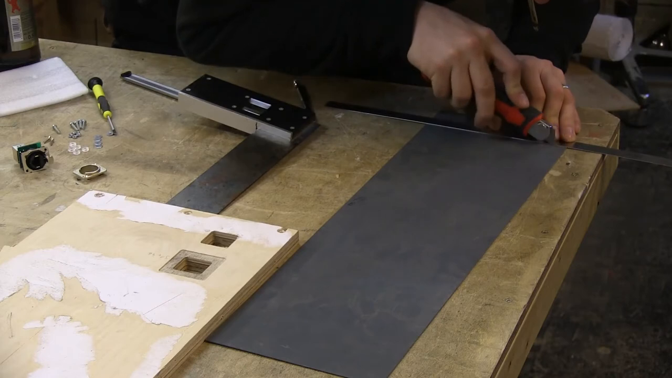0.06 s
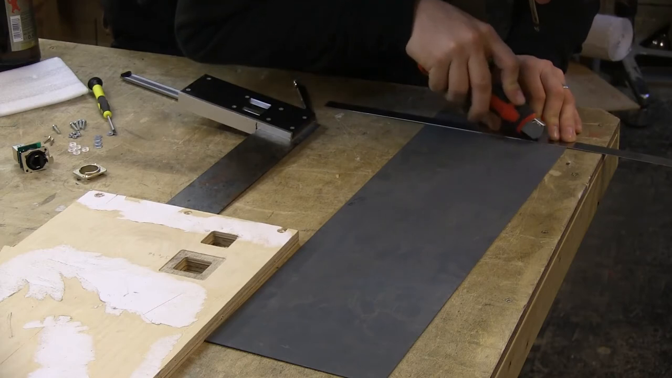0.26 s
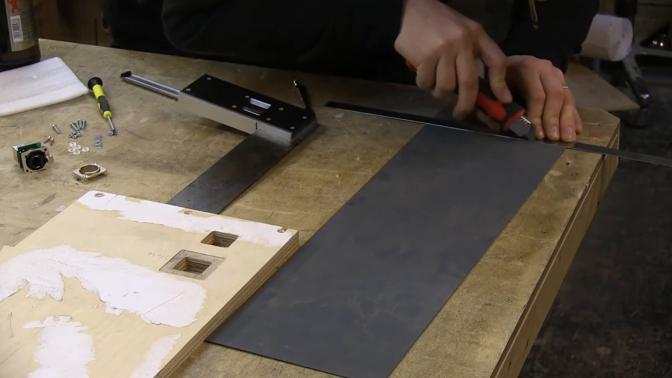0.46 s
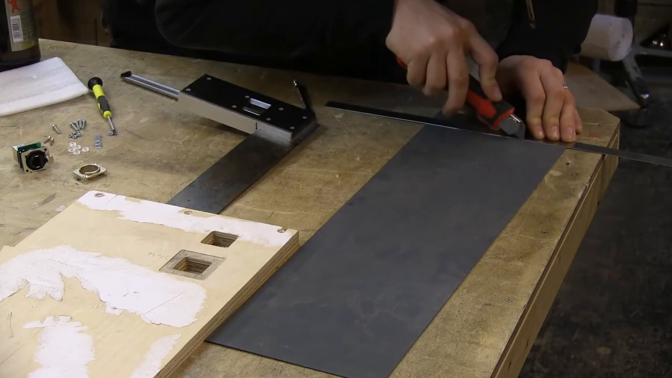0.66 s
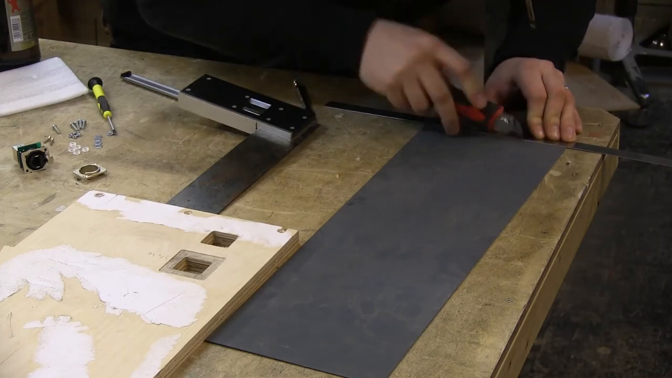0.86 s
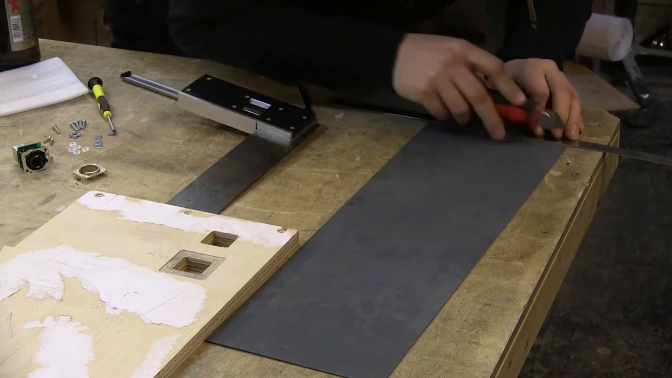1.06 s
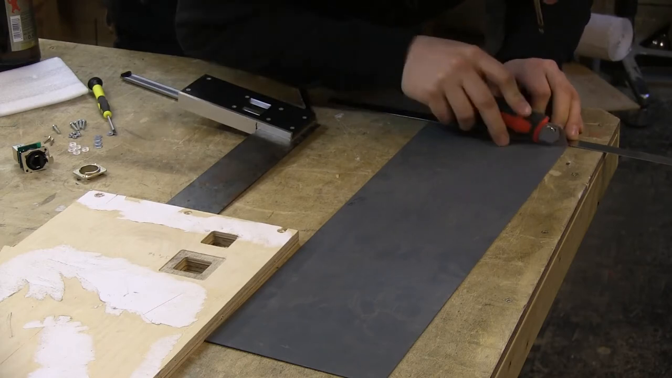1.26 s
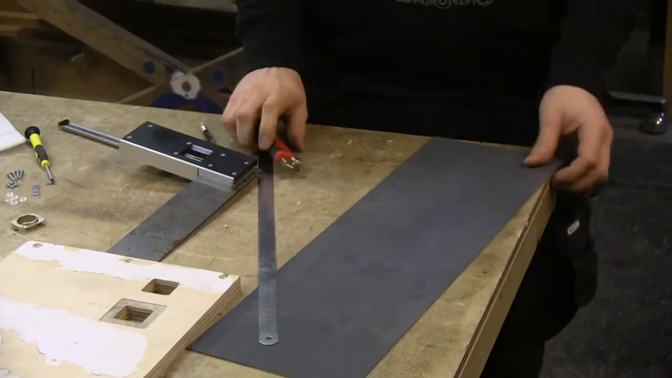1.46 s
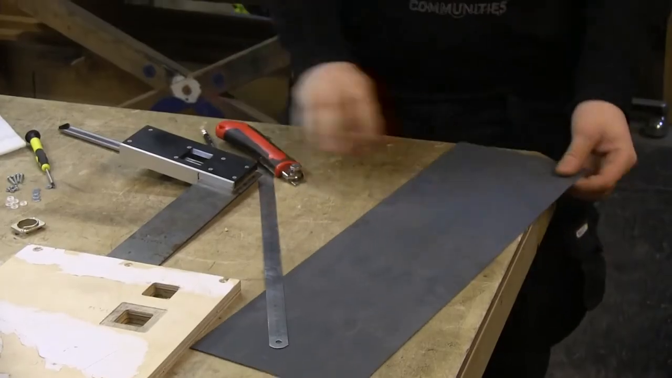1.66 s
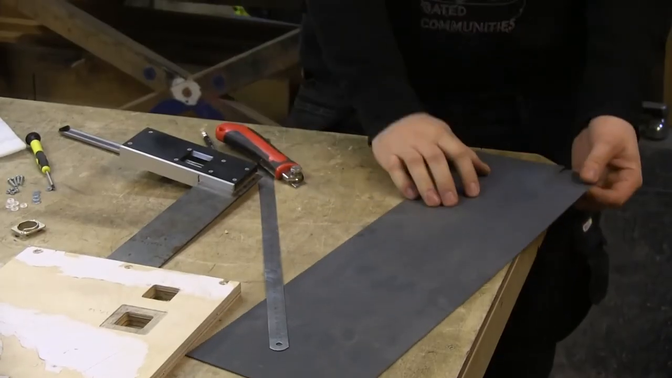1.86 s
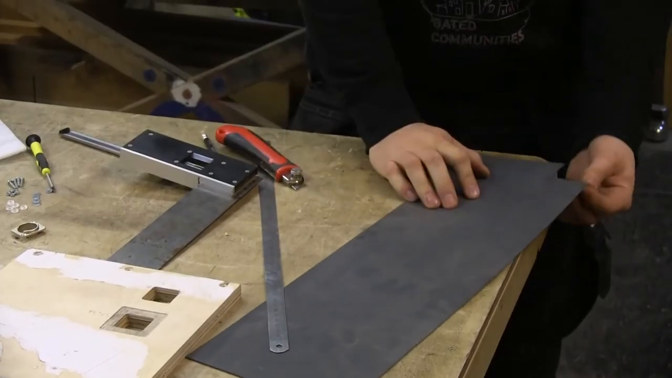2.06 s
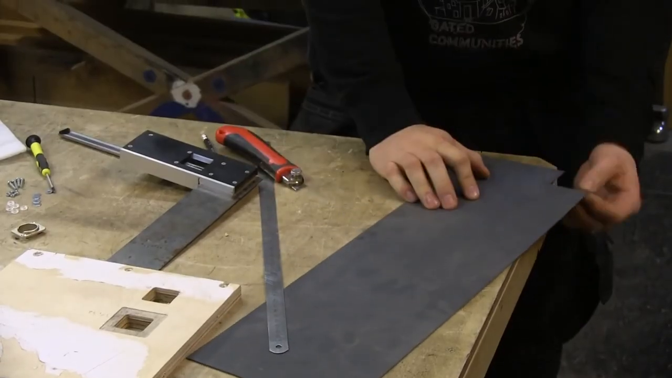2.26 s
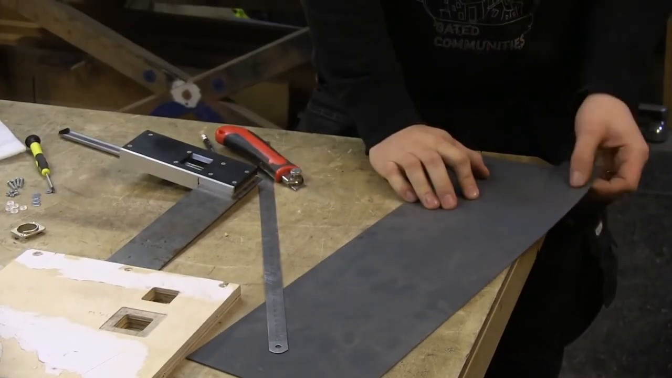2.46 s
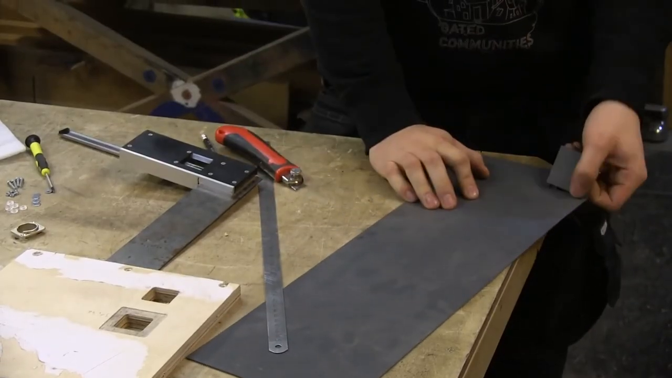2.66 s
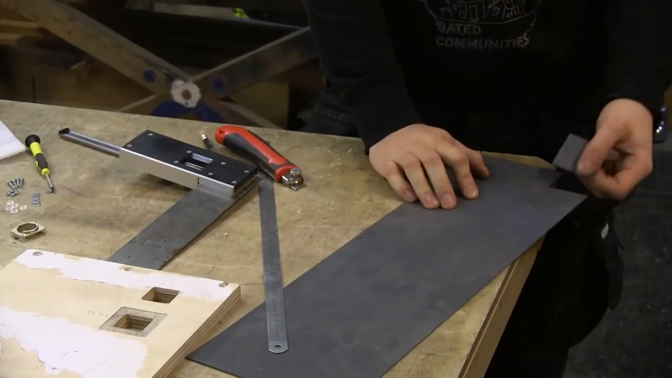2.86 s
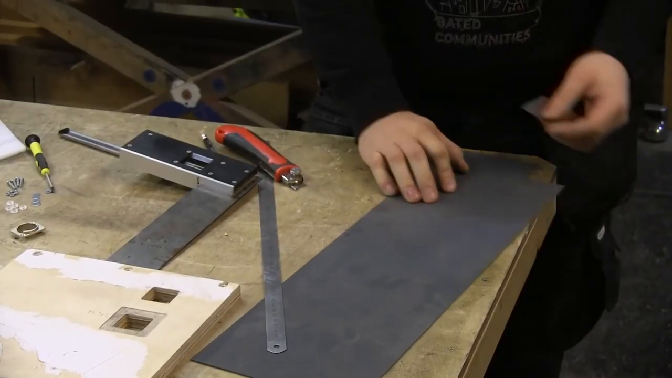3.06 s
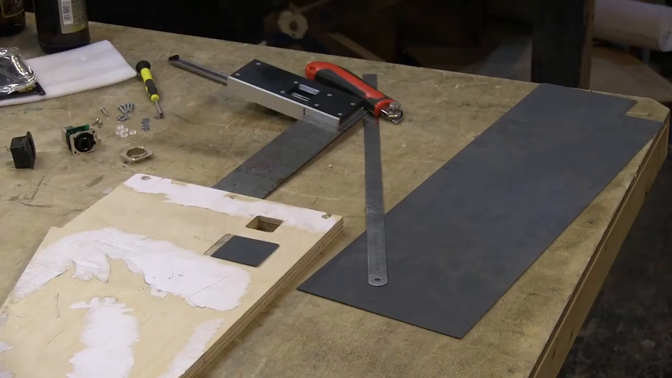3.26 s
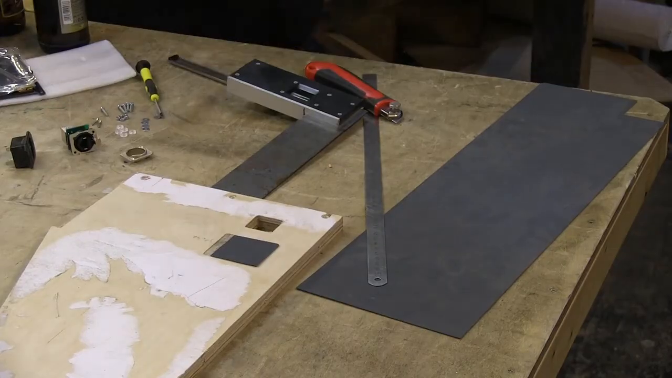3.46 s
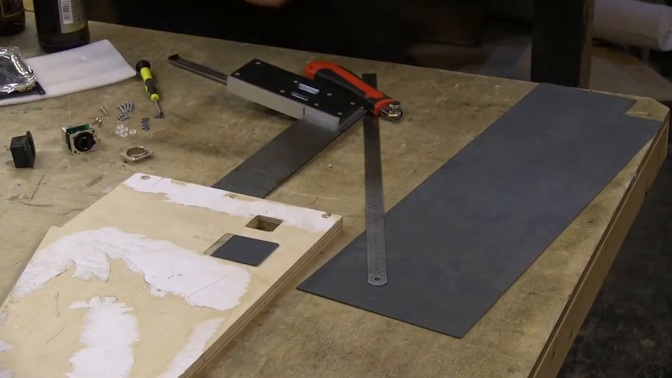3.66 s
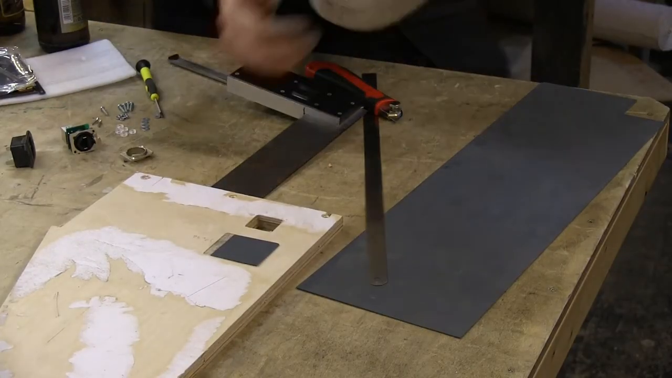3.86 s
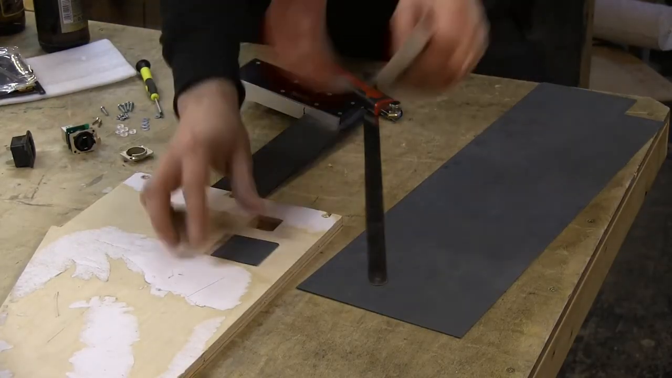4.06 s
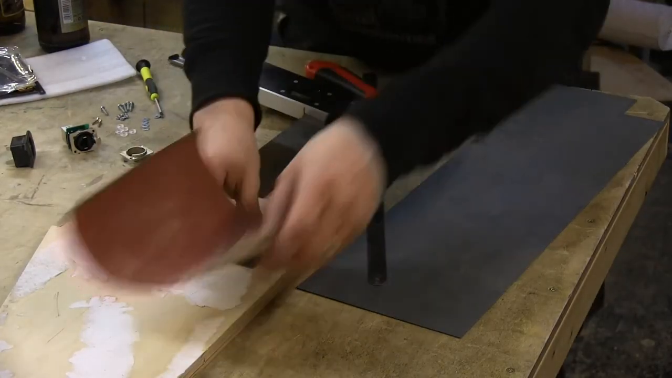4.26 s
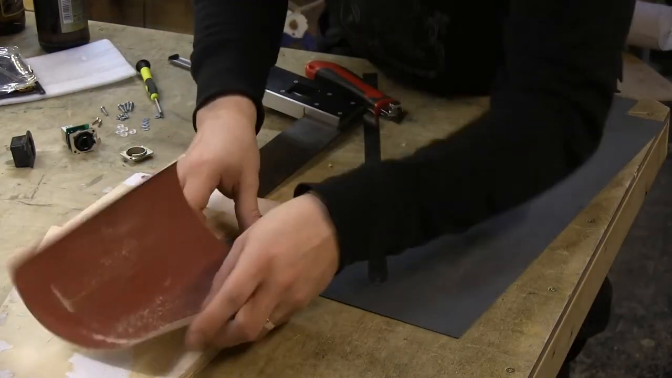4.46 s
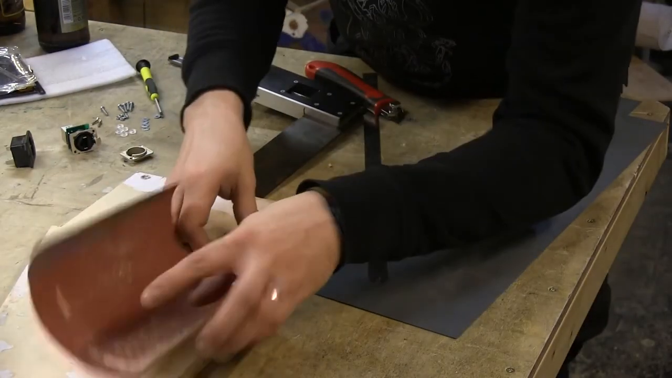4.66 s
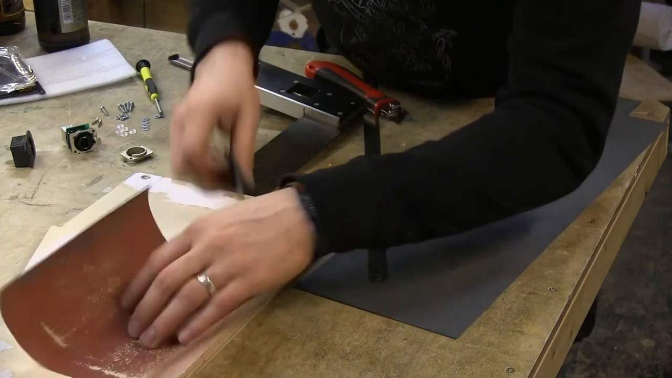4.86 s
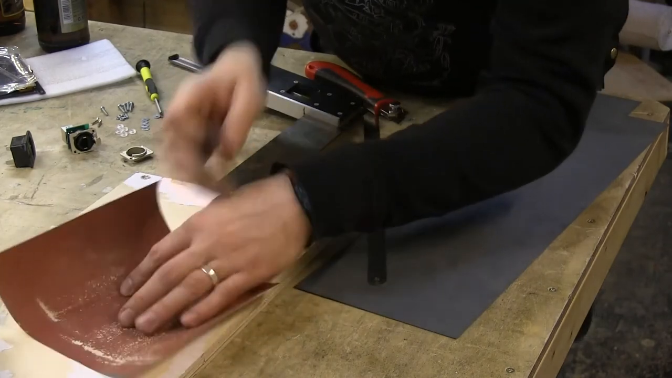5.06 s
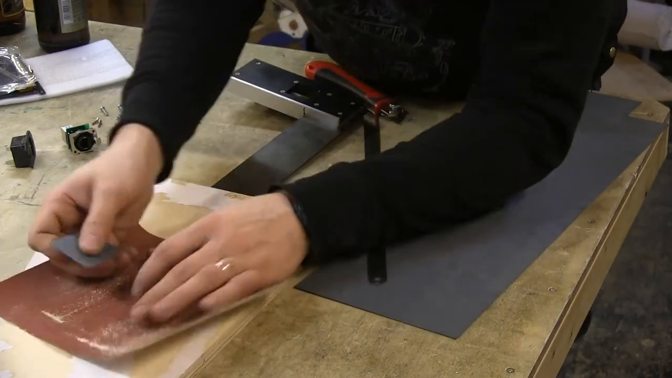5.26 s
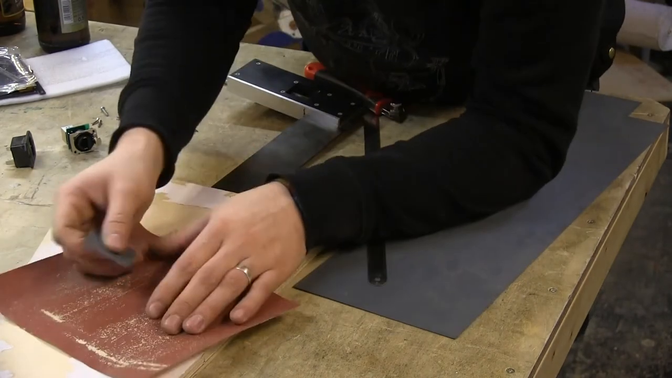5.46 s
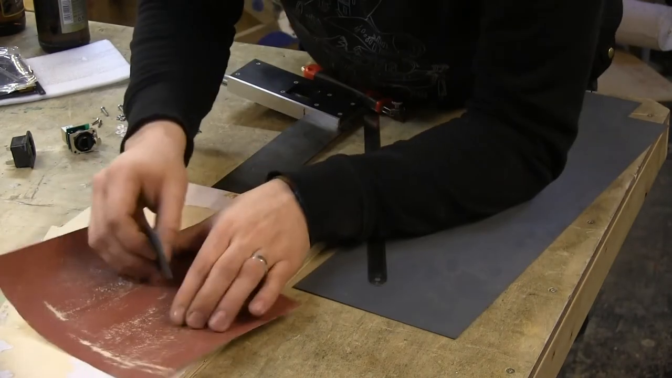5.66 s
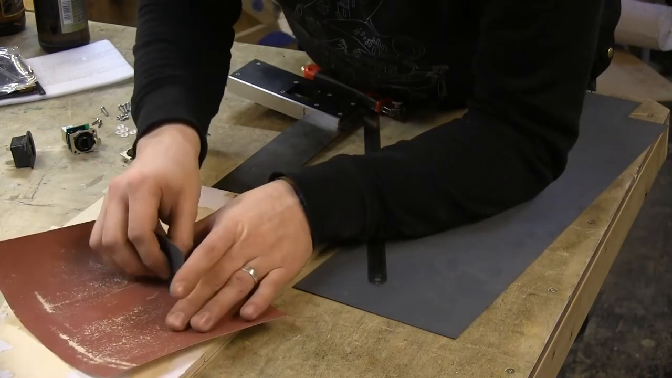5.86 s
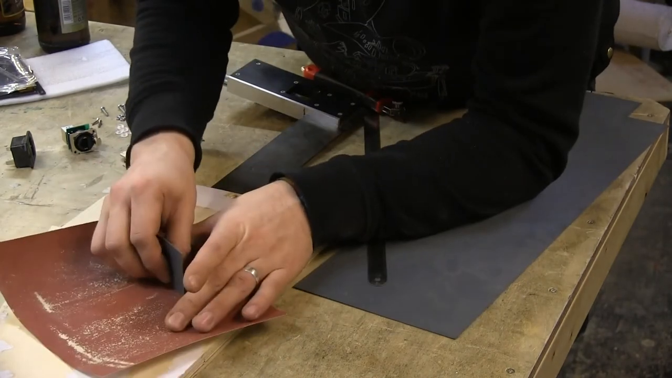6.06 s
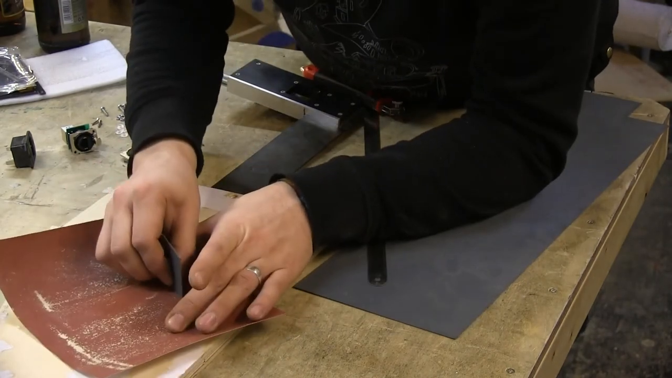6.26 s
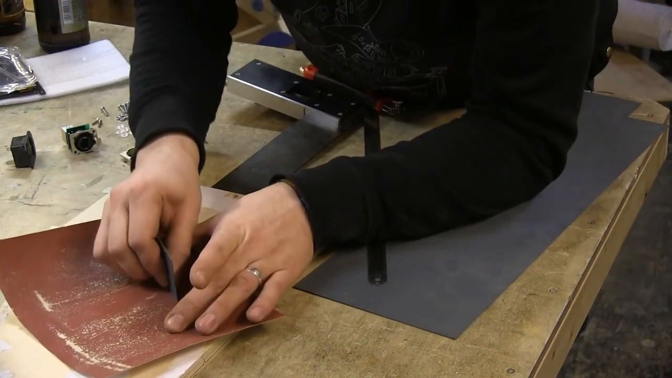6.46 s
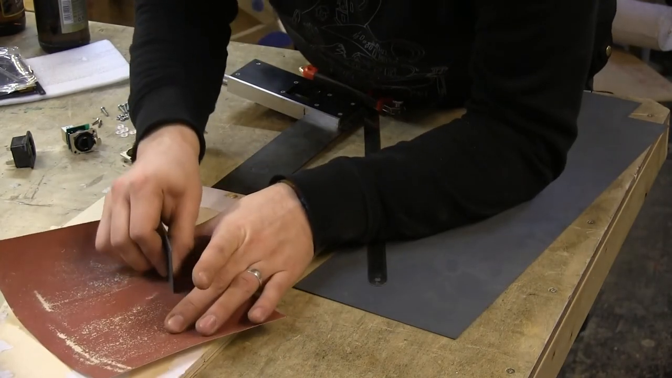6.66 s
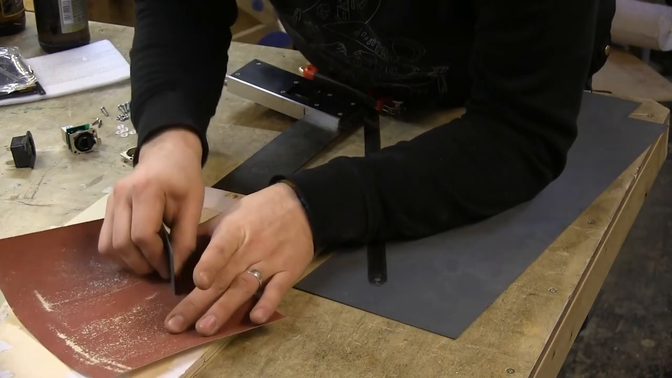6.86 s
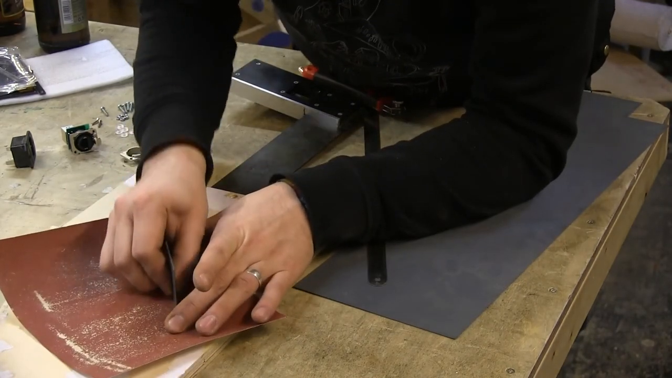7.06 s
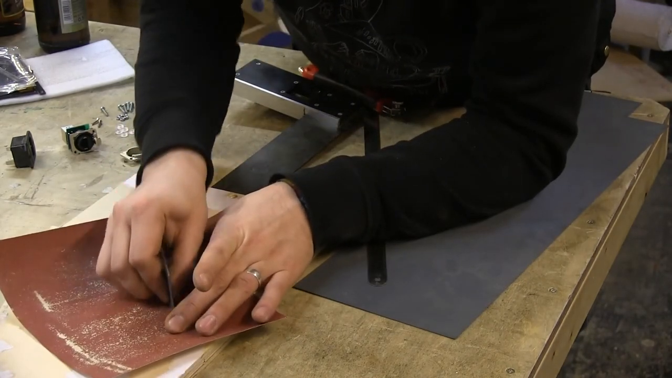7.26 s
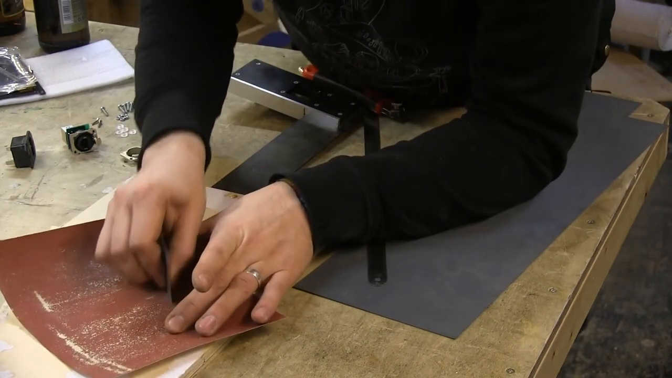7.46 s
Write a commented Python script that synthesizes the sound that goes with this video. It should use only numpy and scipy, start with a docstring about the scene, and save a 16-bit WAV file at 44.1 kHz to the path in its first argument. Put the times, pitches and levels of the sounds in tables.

```python
"""At a workbench a knife and a ruler are put down, a scored piece of plastic is flexed and snapped off,
a sheet of sandpaper is fetched and spread on a plywood board, and the piece is sanded back and forth.
Blows are noise bursts ringing bench, board or plastic; rubs and sanding are shaped, patchy noise.
A quiet workshop of soft noise and unsteady tones hums behind; its walls answer every knock."""
import sys
import numpy as np
from scipy import signal
from scipy.fft import rfft, irfft, next_fast_len
from scipy.io import wavfile
from scipy.ndimage import uniform_filter1d, map_coordinates

SR = 44100
rng = np.random.default_rng(int(sys.argv[2]) if len(sys.argv) > 2 else 0)


def wav_out(sig):
    """Save sig, one row per channel (or a flat mono array), as 16-bit PCM at SR to the path in sys.argv[1]."""
    wavfile.write(sys.argv[1], SR, np.round(np.clip(np.atleast_2d(sig).T, -1, 1) * 32767).astype(np.int16))


N = 331543

# the workshop's soft rush: spectrum [f/Hz, level/dB per Hz, relative]; loudness [t/s, level/dB rms]
SHOP_SPECTRUM = [(25, -49), (70, -22), (110, 2.5), (200, 0.5), (260, 4.5), (350, -2), (500, -8), (700, -9),
                 (1000, -10.5), (1600, -13.5), (2500, -17), (5000, -21), (16000, -30)]
SHOP_LEVEL = [(0, -70), (0.401, -66), (3.3, -63), (7.52, -65.5)]
# machine tones, before their wavering: [f/Hz, level/dB rms]
MACHINE_TONES = [(100, -76), (120, -72.5), (171.8, -86.5), (253, -81.5), (346.6, -72), (464.8, -84.5),
                 (694, -82.5)]
# hands, plastic and paper sliding; around 1.4-1.8 s, the rattle after the tools land:
# [peak t/s, swell t/s, fade t/s, surface hiss level/dB, sheet drag level/dB, wood rumble level/dB]
RUBS = [(0.4, 0.075, 0.23, -81, -72.5, -71), (0.72, 0.047, .04, -80, -71, -66.5),
        (0.976, 0.019, .03, -57, -59, -56), (1.466, 0.025, 0.037, -35.5, -35.5, -28),
        (1.56, .031, 0.039, -28.5, -27, -23.5), (1.63, 0.07, 0.21, -38.5, -44, -37.5),
        (1.72, 0.023, 0.033, -34, -41, -27), (1.939, .025, .042, -36.5, -47.5, -50),
        (2.127, 0.011, .06, -57.5, -59.5, -48), (2.645, 0.024, 0.15, -62.5, -68, -58.5),
        (3.15, 0.071, 0.081, -30, -48, -48), (3.224, 0.057, 0.035, -36.5, -49.5, -55),
        (3.38, 0.27, 0.076, -66, -68, -63), (3.542, 0.021, 0.095, -64, -66.5, -64),
        (3.668, .022, 0.067, -52, -52, -47.5), (3.769, .07, .082, -49.5, -51, -49.5),
        (3.928, 0.036, 0.041, -54.5, -48.5, -54.5), (4.01, 0.038, 0.096, -67, -60.5, -57.5),
        (4.106, 0.0077, .047, -33, -35.5, -43), (4.14, 0.043, .084, -31, -34.5, -33.5),
        (4.34, 0.13, 0.14, -42.5, -43, -42), (4.448, 0.053, 0.043, -43.5, -39, -41.5),
        (4.54, 0.058, 0.034, -53, -50, -49), (4.628, 0.067, .062, -39, -42.5, -45.5),
        (4.731, 0.074, .03, -53, -44, -54.5), (4.819, .036, 0.054, -48.5, -47, -42),
        (4.873, .013, .027, -42, -35.5, -36.5), (4.965, 0.053, 0.079, -41, -35.5, -39.5),
        (5.068, 0.03, 0.032, -32.5, -33, -41), (5.132, .06, 0.038, -26.5, -33.5, -36),
        (5.25, .045, .04, -33.5, -35.5, -33.5), (5.3, 0.016, 0.029, -36.5, -34.5, -37.5),
        (5.354, 0.025, .035, -38, -36, -37.5), (5.41, .025, 0.051, -39.5, -28, -45.5),
        (5.477, .013, 0.062, -36, -30.5, -33.5), (5.538, 0.055, 0.033, -40, -37, -26),
        (5.635, 0.033, 0.031, -37, -37.5, -36.5), (5.684, 0.022, 0.051, -38.5, -32.5, -36),
        (5.807, 0.05, 0.16, -38, -41, -45.5), (5.968, 0.039, 0.04, -49.5, -36.5, -38.5),
        (6.15, 0.07, 0.083, -68.5, -62, -75), (6.254, 0.018, 0.072, -35.5, -37.5, -46.5),
        (6.33, 0.035, .05, -39.5, -41, -37.5)]
# the plastic cracking and tapping, before the room:
# [t/s, crack level/dB, knock level/dB, knock f/Hz, nominal contact t/s, left-right level/dB]
SNAPS = [(0.974, -39, -38.5, 4250, .0072, 2.5), (2.144, -11.5, -21.5, 2850, .035, 0.5),
         (2.147, -21, -24.5, 1594, .022, 11.5), (2.153, -12.5, -50.5, 2410, 0.01, -2),
         (2.694, -11, -39.5, 2097, .0073, -1.5), (2.698, -10.5, -26, 2280, .0052, -3.5),
         (6.244, -27, -25, 1150, .011, -1), (6.256, -26.5, -28, 2700, 0.0054, 7.5),
         (6.518, -34.5, -23.5, 1690, 0.022, 0), (6.925, -16.5, -16, 1037, 0.0066, -11),
         (6.929, -15, -13.5, 1710, 0.0078, -11), (7.282, -28.5, -25, 1810, 0.019, 2.5)]
# tools put down on the bench:
# [t/s, thud level/dB, knock level/dB, knock f/Hz, nominal contact t/s, left-right level/dB]
TOOLS = [(1.438, -19.5, -13.5, 1410, 0.046, 2), (1.454, -23.5, -27.5, 960, .02, -0.5),
         (1.533, -9.5, -6.5, 930, 0.08, -3), (1.672, -13.5, -4.5, 1200, 0.037, 2),
         (1.699, -16, -25.5, 970, 0.027, -2), (1.735, -22.5, -12, 1080, 0.058, 0),
         (2.371, -29, -43, 1260, 0.075, 2.5), (3.021, -23, -31.5, 1175, 0.12, 5.5)]
# the board knocked through the paper: columns as for the tools
KNOCKS = [(4.154, -4.5, -14, 756, 0.09, 1), (4.448, -29.5, -24.5, 1590, .045, 2),
          (4.797, -18.5, -19, 820, 0.064, -1.5), (4.964, -34.5, -16, 840, 0.0067, 0.5),
          (5.182, -11.5, -14.5, 1134, 0.036, 1.5), (5.199, -13, -15, 850, 0.024, 3),
          (5.395, -61.5, -20.5, 1370, 0.064, -2), (5.455, -41, -15, 1097, 0.13, 0),
          (5.486, -15, -41, 2240, 0.039, 5.5), (5.501, -5, -8.5, 864, 0.012, 1),
          (5.586, -9.5, -11, 880, 0.061, 1), (5.945, -12, -6.5, 815, 0.049, 0),
          (6.29, -22, -17.5, 1170, 0.093, 1.5), (6.889, -23, -14.5, 1243, 0.054, -11)]
# very short dry clicks, the sharp edges of blows and taps, and paper creases:
# [t/s, peak level/dB, f/Hz, left-right level/dB]
CLICKS = [(1.4398, -14, 3240, 6), (1.457, -16.5, 3000, 2.5), (1.5348, -11.5, 2410, 5.5),
          (1.6755, -10.5, 2790, 8.5), (3.927, -23, 3420, 0), (4.3621, -24, 3040, 1), (4.6237, -20, 2856, 4),
          (4.802, -22.5, 1820, 11), (4.871, -18.5, 3205, 6.5), (4.885, -34.5, 4140, 4),
          (4.9436, -20, 1750, 6), (4.979, -28, 1780, 2), (4.9635, -35, 1696, 5.5), (5.3477, -25, 2450, 0.5),
          (5.4613, -16.5, 1640, 3.5), (5.4984, -9, 1730, 5), (5.6427, -32.5, 4860, -3.5),
          (5.6832, -29, 2800, 8), (6.091, -29.5, 1570, 2), (5.9475, -14.5, 2640, 5), (6.2428, -15, 4095, 4),
          (6.2897, -14.5, 1800, 1), (6.8906, -13.5, 1350, -2), (6.9282, -5.5, 1670, 6)]
# fingers turning the small piece: [start t/s, end t/s, nominal level/dB]
FIDGETS = [(2.617, 2.69, -61.5), (3.306, 3.513, -62.5), (3.506, 3.63, -61), (3.947, 4.08, -65.5),
           (6.086, 6.24, -60.5)]
# the freed piece rings: [t/s, peak level/dB, f/Hz, 60 dB decay t/s]
FREED_RING = [(2.697, -13, 2170, .14)]
# sanding strokes, levels before the speed swing: [start t/s, hiss level/dB, plate level/dB,
# plate f/Hz, plate's low mode level/dB, bench level/dB]
STROKES = [(6.389, -33, -37, 2270, -39, -64), (6.507, -30, -34.5, 1790, -34.5, -46.5),
           (6.635, -27, -36.5, 1870, -30, -53), (6.768, -25.5, -35.5, 2045, -33, -47),
           (6.885, -26, -37.5, 1640, -29.5, -41), (7.02, -25.5, -26.5, 1846, -35, -38.5),
           (7.147, -26, -31, 1880, -48.5, -41), (7.276, -24.5, -33, 1785, -32, -59.5),
           (7.391, -24.5, -29.5, 1870, -44, -47)]

# resonances of bench, board, plastic, turned piece and sanded plate: [f/Hz, width f/Hz, level/dB]
BENCH_MODES = [(413, 12, 2.5), (710, 80, 1), (1114, 93, -2), (1420, 18, -18.5), (1560, 18, -52.5),
               (2100, 100, -19), (2520, 64, 4), (4220, 100, -24), (5000, 130, -24.5)]
BOARD_MODES = [(376.3, 66, -2.5), (659, 32, -9), (854, 23, -19), (1330, 29, -10.5), (1700, 29, -17.5),
               (1820, 54, -15), (2520, 29, -20)]
BOARD_LOWEST_MODE = [(136, 27, 2)]  # rung by knocks only
PLASTIC_MODES = [(2020, 120, -4), (4230, 400, 1.5), (7600, 2300, 5)]
PIECE_MODES = [(2300, 420, 6.5), (4300, 300, -3), (7160, 610, -6.5)]
PLATE_LOW_MODE = [(1084, 150, -3)]

# friction colours: airy fizz down to the whole bench shaking, then grit: [f/Hz, level/dB per Hz, relative]
FIZZ_SPECTRUM = [(7000, -23), (9000, 3.5), (12000, 0.5), (15000, -12), (16000, -14)]
HISS_SPECTRUM = [(2200, -31.5), (3300, 4), (4500, 3), (7000, -1.5), (9000, -7), (11000, -33.5)]
SCRAPE_SPECTRUM = [(1300, -37), (1900, 1.5), (2300, 1.5), (3200, 0), (4500, -41.5)]
DRAG_SPECTRUM = [(550, -31.5), (900, 0), (1300, 7), (1800, 6), (2600, -36)]
RUMBLE_SPECTRUM = [(40, -41.5), (80, -22.5), (125, -9), (200, 1.5), (370, -1), (650, 0), (1000, 0.5),
                   (1500, -32.5)]
SHAKE_SPECTRUM = [(50, -23.5), (85, -13), (125, 1), (160, -4.5), (230, -38.5)]
GRIT_SPECTRUM = [(350, -52), (600, -4.5), (717, -31), (790, -15), (1070, -3.5), (1260, -5.5), (1850, -0.5),
                 (2990, -3), (8620, -12.5), (14700, -26.5), (16000, -36)]

# stereo width: [f/Hz, left-right correlation]
LIKENESS = [(60, 1), (240, 0.91), (950, 0.64), (3770, 0.69), (15000, 0.46)]
# room decay: [f/Hz, 60 dB decay t/s]
WALL_DECAY = [(100, 0.52), (260, 0.25), (700, 0.19), (1840, 0.18), (4850, 0.15), (12800, 0.17)]

FIZZ_DB, FIZZ_GROWS = -53.5, 1.15  # fizz beside hiss and drag of -40 dB; dB of fizz per dB of hiss
FIZZ_LIGHT = 0.18  # a light brush, with more hiss than drag, fizzes more: dB per dB
SCRAPE_FOLLOWS_HISS, SCRAPE_DB = 0.52, 0.85  # the scrape lies between drag and hiss: share, lift in dB
SHAKE_DB, SHAKE_GROWS = -41.5, 0.75  # shake beside a rumble of -30 dB; dB of shake per dB of rumble
RUB_EDGE_DB, RUB_ROUND = 11, 1.79  # drop one swell or fade away from the peak; roundness of the top
BENCH_THUD_HZ, BOARD_THUD_HZ, PLASTIC_THUD_HZ = 520, 406, 530
BENCH_CRACK_DB, BOARD_CRACK_DB = -33.5, -45.5  # the crack beside a knock of -15 dB
CRACK_GROWS = 1.6  # harder blows crack more: dB of crack per dB of knock
PLASTIC_THUD_DB = -17.5  # thud relative to crack
SANDED_BOARD_DB = -38  # before the speed swing
LAST_TURN = 7.53  # s, end of the last stroke
TOP_HZ = 15900


def amp(db):
    """Decibels to amplitude."""
    return 10 ** (np.asarray(db) / 20)


def unit(x):
    """Scales x to rms 1."""
    return x / np.sqrt(np.mean(x ** 2) + 1e-20)


def along(points, hz):
    """Reads (Hz, value) points on a log frequency axis."""
    f, value = np.transpose(points)
    return np.interp(np.log(hz + 1), np.log(f + 1), value)


def wobble(rate):
    """A smooth random curve, rate knots a second."""
    knots = rng.standard_normal(int(N * rate / SR) + 4)
    return map_coordinates(knots, [np.arange(N) * rate / SR])


def filtered(x, response):
    """Filters x by a complex response of frequency."""
    n = x.shape[-1]
    m = next_fast_len(n + 8192)
    return irfft(rfft(x, m) * response(np.fft.rfftfreq(m, 1 / SR)), m)[..., :n]


def modes(table, between_db):
    """Causal resonances over a flat response."""
    def response(f):
        rings = sum(amp(db) * 1j * f * w / (c * c - f * f + 1j * f * w) for c, w, db in table)
        return amp(between_db) + rings
    return response


def band(hz, width):
    """A steep causal band: one resonance applied twice, width as a share of its pitch."""
    return lambda f: modes([(hz, width * hz, 0)], between_db=-120)(f) ** 2


def stereo(pair, spectrum):
    """Two unrelated signals, coloured, then mixed as mid and side to the tabled left-right likeness."""
    def response(hz):
        angle = np.arccos(np.clip(along(LIKENESS, hz), -1, 1)) / 2
        return amp(along(spectrum, hz)) * [np.cos(angle), np.sin(angle)]
    mid, side = filtered(pair, response)
    return np.array([mid + side, mid - side])


def rush(spectrum, grain_db, patchy_db):
    """Stereo friction noise of rms 1: grains of uneven size, in patches of random gain."""
    grains = rng.standard_normal((2, N)) * amp(grain_db * wobble(900))
    z = signal.stft(grains, nperseg=256)[2]
    field = rng.standard_normal(z.shape[1:])
    field = uniform_filter1d(field, size=4, axis=0)  # patches spread over frequency
    field = uniform_filter1d(field, size=6, axis=1)  # and over time
    patchy = signal.istft(z * amp(patchy_db * unit(field)), nperseg=256)[1][:, :N]
    return unit(stereo(patchy, spectrum))


def walls(x):
    """A fresh room tail; each frequency dies at its own speed."""
    noise = stereo(rng.standard_normal((2, len(x))), [(1, 0)])
    hz, t, z = signal.stft(noise, SR, nperseg=256)
    decay = amp(-60 * t / along(WALL_DECAY, hz)[:, None])
    tail = signal.istft(z * decay, SR, nperseg=256)[1]
    return signal.fftconvolve(x[None], tail / np.linalg.norm(tail[0]), axes=1)[:, :len(x)]


def add(out, s, sound, pan_db, room_db):
    """Adds a panned sound and its room tail at time s."""
    start = round(s * SR)
    panned = sound * amp([[pan_db / 2], [-pan_db / 2]])
    out[:, start:start + len(sound)] += panned + amp(room_db) * walls(sound)


def blows(table, body, thud_hz, soft, room_db):
    """Each blow is a rattling contact that rings the body: low thud, pitched knock and bright crack."""
    out, t = np.zeros((2, N + SR)), np.arange(SR // 2) / SR
    thud_part = band(thud_hz, 1.04)
    crack_part = lambda f: (1j * f / (1j * f + 2500)) ** 2 / (1 + 1j * f / 6000) ** 2
    for s, thud_db, knock_db, crack_db, knock_hz, contact, pan_db in table:
        knock_part = lambda f: band(knock_hz, 1.2)(f) / (1 + 1j * f / (2 * knock_hz)) ** 2
        # colour, level, and how long it lasts relative to the nominal contact
        parts = [(thud_part, thud_db, 1.05), (knock_part, knock_db, .95), (crack_part, crack_db, .6)]
        sound = 0
        for colour, part_db, last in parts:
            push = rng.standard_normal(len(t)) * amp(-60 * t / (max(contact, .003) * last))
            push *= 1 - np.exp(-t / soft)  # a yielding contact builds up over a moment
            part = filtered(push, lambda f: colour(f) * body(f))
            onset_rms = np.linalg.norm(part[:400]) / 20
            sound = sound + amp(part_db) * part / (3 * onset_rms)
        add(out, s, sound, pan_db, room_db)
    return out[:, :N]


def with_crack(table, crack_db):
    """Blows on wood crack more steeply as the knock gets harder."""
    rows = []
    for s, thud_db, knock_db, *rest in table:
        rows.append((s, thud_db, knock_db, crack_db + CRACK_GROWS * (knock_db + 15), *rest))
    return rows


def shop():
    """Far machines fill the room with a soft rush and slightly unsteady tones."""
    s, level_db = np.transpose(SHOP_LEVEL)
    t = np.arange(N) / SR
    hum = 0
    for hz, db in MACHINE_TONES:
        level = np.sqrt(2) * amp(db + 2.3 * wobble(12.0))
        hum = hum + level * np.sin(2 * np.pi * hz * t + 0.85 * wobble(3.3))
    return amp(np.interp(t, s, level_db)) * rush(SHOP_SPECTRUM, grain_db=-1.5, patchy_db=0.1) + hum


def rubs_and_rattle():
    """Noise swells and fades: fizz and hiss on the surface, scrape and drag in the sheet, rumbling wood."""
    t, power = np.arange(N) / SR, np.zeros((6, N))
    for s, rise, fall, hiss_db, drag_db, rumble_db in RUBS:
        fizz_db = FIZZ_DB + FIZZ_GROWS * (hiss_db + 40) + FIZZ_LIGHT * (hiss_db - drag_db)
        scrape_db = drag_db + SCRAPE_FOLLOWS_HISS * (hiss_db - drag_db) + SCRAPE_DB
        shake_db = SHAKE_DB + SHAKE_GROWS * (rumble_db + 30)
        levels_db = np.c_[[fizz_db, hiss_db, scrape_db, drag_db, rumble_db, shake_db]]
        a, b = round((s - 4 * rise) * SR), round((s + 4 * fall) * SR)
        away = (t[a:b] - s) / np.where(t[a:b] < s, rise, fall)
        power[:, a:b] += amp(levels_db - RUB_EDGE_DB * np.abs(away) ** RUB_ROUND) ** 2
    fizz, hiss, scrape, drag, rumble, shake = np.sqrt(power)
    wood = filtered(rush(RUMBLE_SPECTRUM, grain_db=-1.5, patchy_db=0.0), modes(BOARD_MODES, between_db=-1))
    surface = fizz * rush(FIZZ_SPECTRUM, grain_db=2.0, patchy_db=-1.0)
    surface += hiss * rush(HISS_SPECTRUM, grain_db=-1.0, patchy_db=2.5)
    sheet = scrape * rush(SCRAPE_SPECTRUM, grain_db=-2, patchy_db=2.0)
    sheet += drag * rush(DRAG_SPECTRUM, grain_db=0.5, patchy_db=3.5)
    bench = shake * rush(SHAKE_SPECTRUM, grain_db=2.5, patchy_db=-2.0)
    return surface + sheet + rumble * unit(wood) + bench


def plastic_snaps():
    """Hard plastic cracks and taps: an abrupt contact, with a thud that follows the crack's level."""
    rows = [(s, crack + PLASTIC_THUD_DB, knock, crack, *rest) for s, crack, knock, *rest in SNAPS]
    return blows(rows, modes(PLASTIC_MODES, between_db=0), PLASTIC_THUD_HZ, soft=0.00029, room_db=0.5)


def tools_put_down():
    """Knife and ruler strike the bench and ring its modes."""
    rows = with_crack(TOOLS, BENCH_CRACK_DB)
    return blows(rows, modes(BENCH_MODES, between_db=0.0), BENCH_THUD_HZ, soft=0.0021, room_db=-3.0)


def clicks():
    """Sharp edges of blows and taps, and paper creases: very short dry bursts in a band, with room."""
    out, t = np.zeros((2, N + SR)), np.arange(SR // 3) / SR
    for s, db, hz, pan_db in CLICKS:
        burst = rng.standard_normal(len(t)) * amp(-60 * t / .006) * (1 - np.exp(-t / .0004))
        click = filtered(burst, lambda f: band(hz, 1.3)(f) ** 2)
        add(out, s, amp(db) * click / np.abs(click).max(), pan_db, room_db=1)
    return out[:, :N]


def fidget():
    """Skin slipping on the piece stirs its few modes, unevenly."""
    t = np.arange(N) / SR
    touch = 0
    for start, end, db in FIDGETS:
        touch = touch + amp(db) * np.clip(np.minimum(t - start, end - t) / .02, 0, 1)
    skin = rush([(600, 0), (9000, 0)], grain_db=1.5, patchy_db=2.5)
    piece = unit(filtered(skin, modes(PIECE_MODES, between_db=-18)))
    return touch * amp(1.2 * wobble(30)) * piece


def ring():
    """One wavering mode of the piece that has just come free."""
    out, t = np.zeros((2, N + SR)), np.arange(SR // 2) / SR
    for s, db, hz, t60 in FREED_RING:
        mode = np.sin(2 * np.pi * hz * t + 1.5 * wobble(200)[:len(t)])
        add(out, s, amp(db - 60 * t / t60) * mode, pan_db=-.8, room_db=-8)
    return out[:, :N]


def board_knocks():
    """Knocks through the paper ring the plywood board, down to its lowest mode."""
    rows = with_crack(KNOCKS, BOARD_CRACK_DB)
    body = modes([*BOARD_MODES, *BOARD_LOWEST_MODE], between_db=-5.5)
    return blows(rows, body, BOARD_THUD_HZ, soft=0.00091, room_db=-2.5)


def sanding():
    """The edge speeds up and slows in every stroke; grit hisses, rings the plate, drums board and bench."""
    grit = rush(GRIT_SPECTRUM, grain_db=2.6, patchy_db=2.2)
    pluck = rush([(600, 0), (4000, 0)], grain_db=2.2, patchy_db=3)
    drumming = rush(RUMBLE_SPECTRUM, grain_db=1.8, patchy_db=1.5)
    wood = unit(filtered(drumming, modes(BOARD_MODES, between_db=-9)))
    bench = rush(SHAKE_SPECTRUM, grain_db=2, patchy_db=3)
    out = np.zeros((2, N))
    turns = [round(row[0] * SR) for row in STROKES] + [round(LAST_TURN * SR)]
    for a, end, (s, hiss_db, plate_db, plate_hz, low_db, bench_db) in zip(turns, turns[1:], STROKES):
        b = min(end, N)
        speed = np.abs(np.sin(np.pi * np.arange(b - a) / (end - a)))
        rung = lambda table: unit(filtered(pluck[:, a:b], modes(table, between_db=-40)))
        plate = amp(plate_db) * rung([(plate_hz, 120, 0), (1.1 * plate_hz, 90, -4)])
        plate += amp(low_db) * rung(PLATE_LOW_MODE)
        under = amp(SANDED_BOARD_DB) * wood[:, a:b] + amp(bench_db) * bench[:, a:b]
        out[:, a:b] += amp(hiss_db) * (0.223 + speed ** 1.4) * grit[:, a:b]
        out[:, a:b] += (0.072 + speed ** 1.2) * plate
        out[:, a:b] += (0.65 + speed ** 1.9) * under
    return out


def scene():
    """Sums the room tone, the handling, the blows and the sanding."""
    handling = rubs_and_rattle() + fidget()
    struck = plastic_snaps() + tools_put_down() + clicks() + ring() + board_knocks()
    return shop() + handling + struck + sanding()


def record(dry):
    """The microphone drops the deep bass, saturates softly and keeps nothing above its band limit."""
    x = filtered(dry, lambda hz: (1j * hz / (1j * hz + 45)) ** 2)
    x = x / (1 + np.abs(x / .9) ** 4) ** (1 / 4)
    return filtered(x, lambda hz: hz < TOP_HZ)


dry = scene()
out = record(dry)
wav_out(out)
```